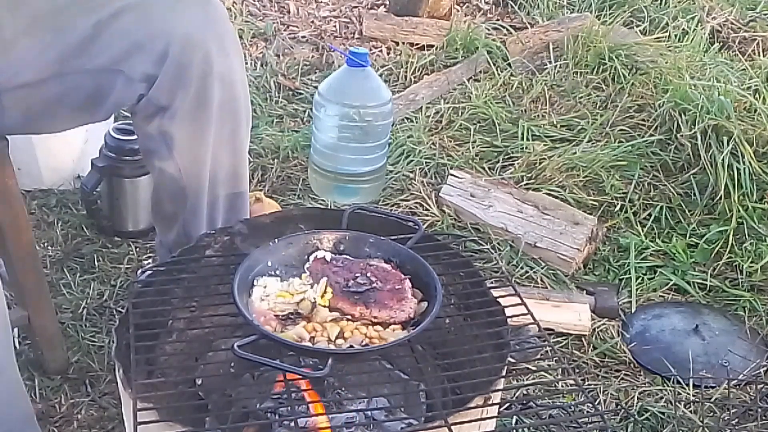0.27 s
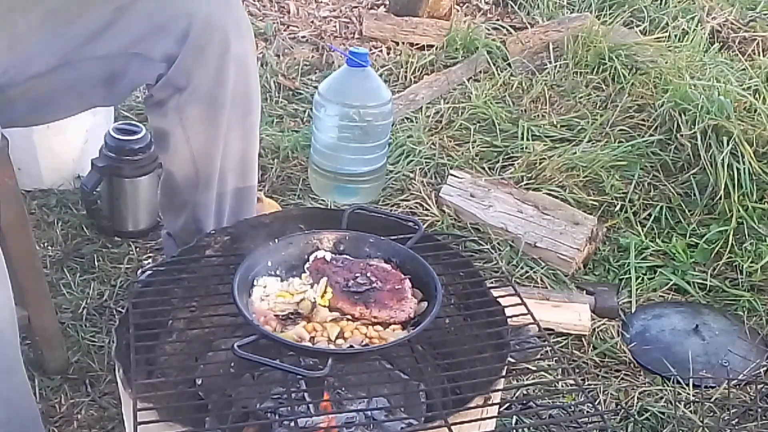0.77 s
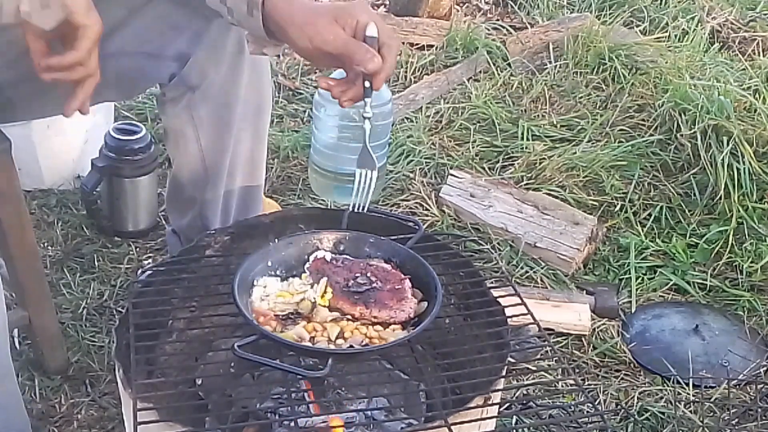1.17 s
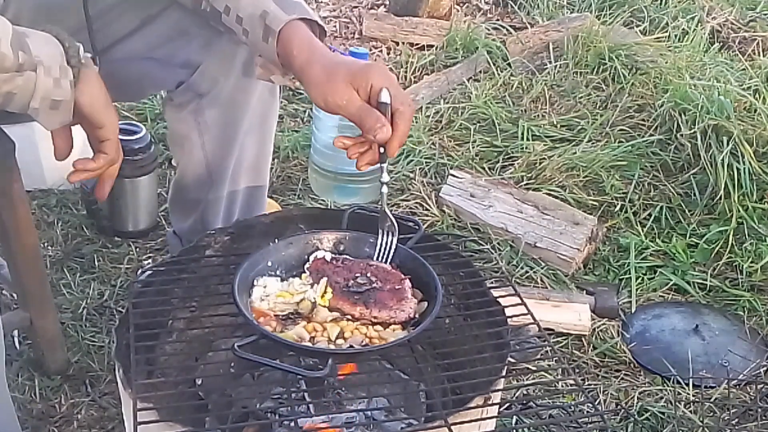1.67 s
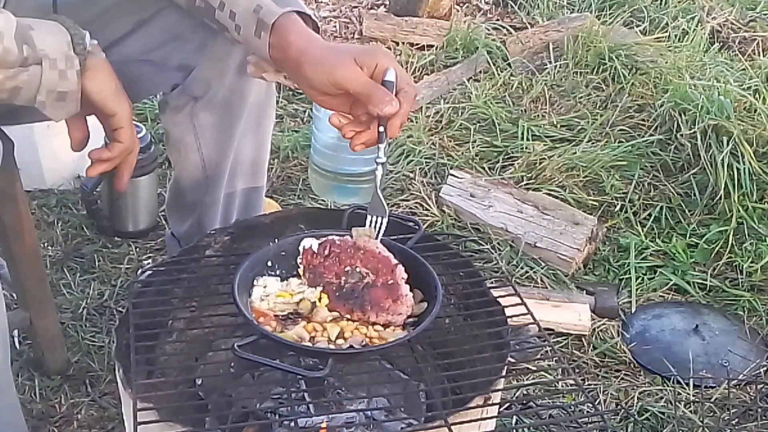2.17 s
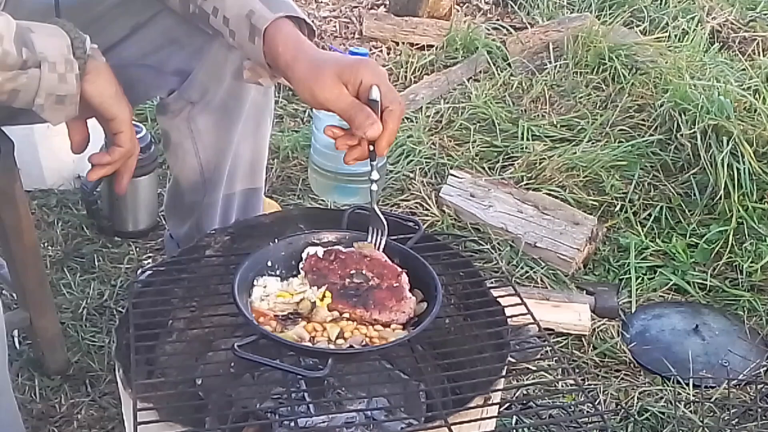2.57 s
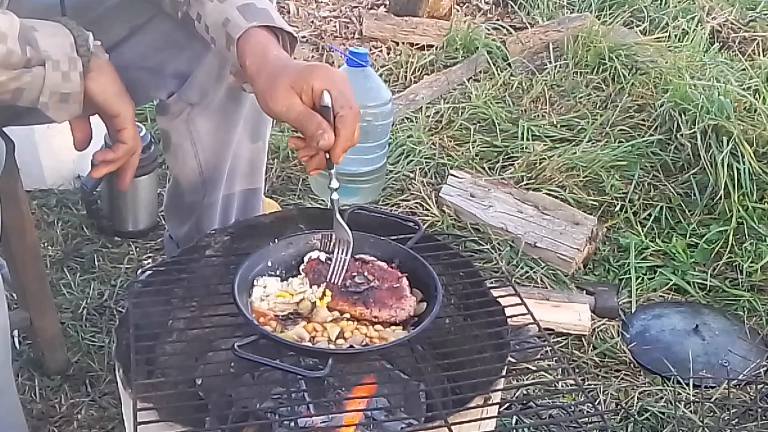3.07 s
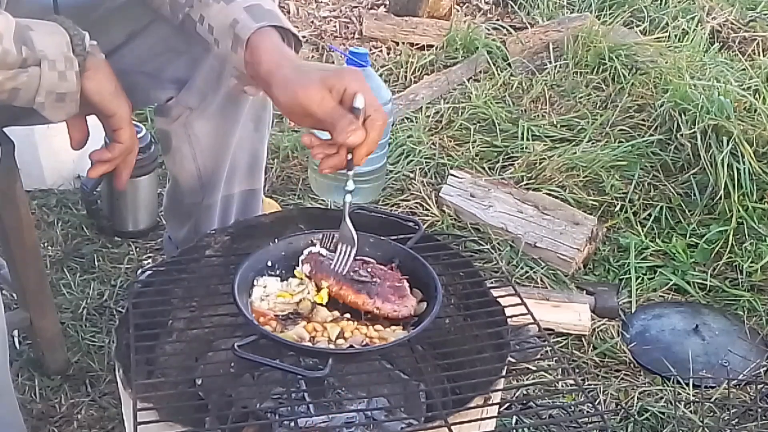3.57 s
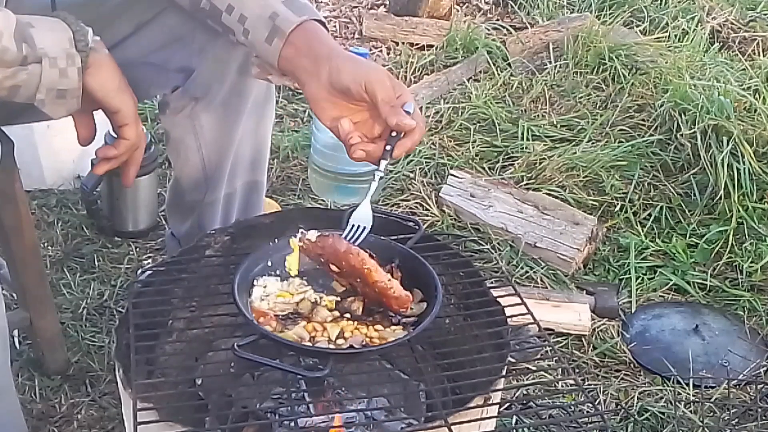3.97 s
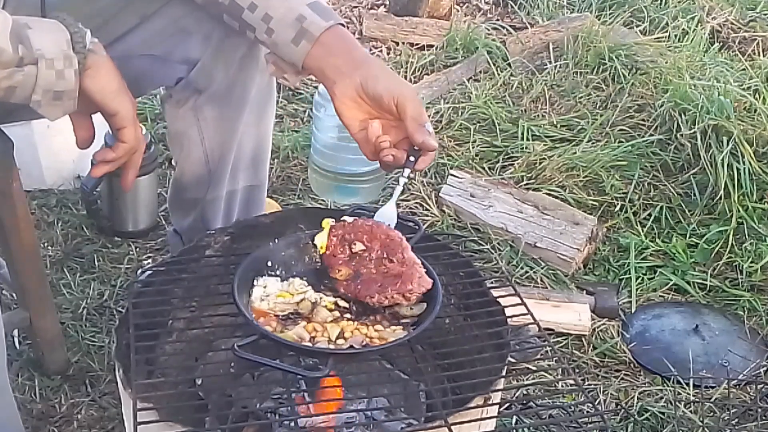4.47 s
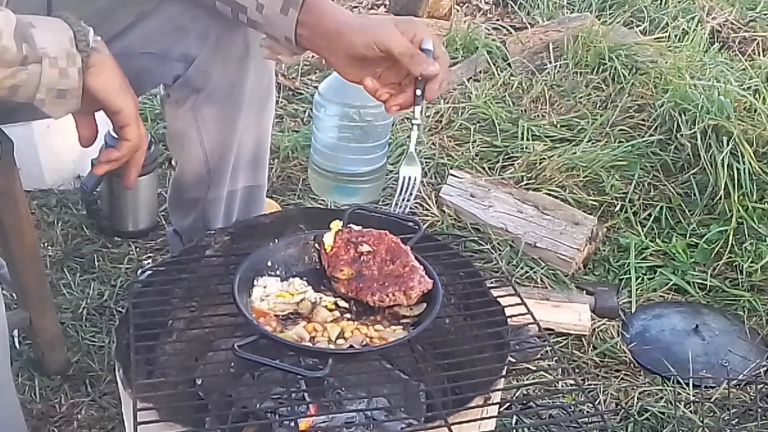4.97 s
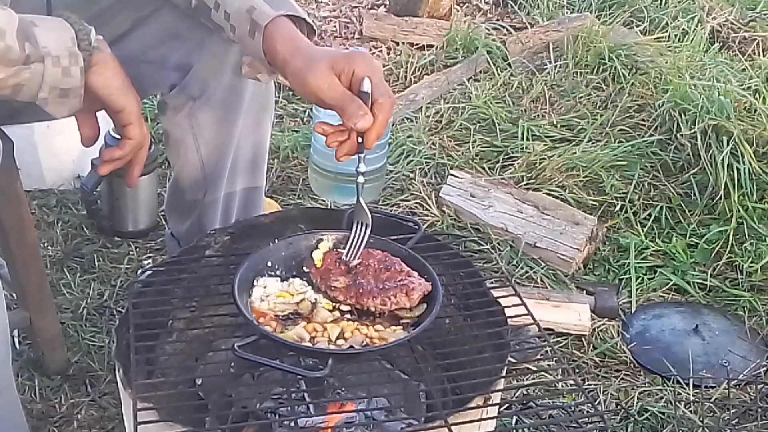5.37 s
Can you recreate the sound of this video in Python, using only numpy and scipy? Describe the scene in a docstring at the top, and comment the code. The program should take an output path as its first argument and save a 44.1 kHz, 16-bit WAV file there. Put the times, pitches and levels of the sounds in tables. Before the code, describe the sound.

Outdoors, close to a pan on a small wood fire, with faint airy noise and soft low draught underneath. For the first second the fat sizzles lightly, with separate bright, dry pops. Pops grow stronger around 1.4 to 1.7 s, and a fork gives a thin, high metallic tick at about 1.6 s. The frying then thins to a quieter, finer hiss until a harder clack of fork on pan at about 2.6 s, short and barely ringing. At once the sizzle surges, crackling thickly, with crowded sharp pops and dry wood snaps from 2.9 to 3.5 s. From about 3.6 s, as the steak is turned, the sound becomes a brighter, finer fizz with fewer pops. The meat lands with a soft low thud near 4.5 s; sizzling pulses on, with crisp pops, snaps near 5.0 to 5.2 s and very faint pressing thumps to the end at roughly 5.6 s.

```python
"""Outdoors, over a small wood fire close by, meat, potatoes and eggs fry in a pan.
Air and draught are filtered noise; burning wood snaps in clicks; steel and pan ring in decaying modes.
The sizzle is three swarms of bubble wavelets, with larger drops popping over it, and surges when
moisture reaches hot metal: a fork lifts the steak and lets it drop, so that juice boils up.
Then the steak is turned over: the sizzle grows finer and brighter, and the meat lands with a soft thud."""
import sys
import numpy as np
from scipy import signal
from scipy.fft import rfft, irfft, next_fast_len
from scipy.io import wavfile
from scipy.ndimage import uniform_filter1d, map_coordinates

SR = 44100
rng = np.random.default_rng(int(sys.argv[2]) if len(sys.argv) > 2 else 0)


def transcribe(signal):
    """Save signal, clipped to [-1, 1], as a 16-bit WAV file at the path in sys.argv[1]."""
    frames = np.atleast_2d(signal).T
    limited = np.clip(frames, -1, 1)
    pcm = np.round(limited * 32767).astype(np.int16)
    wavfile.write(sys.argv[1], SR, pcm)


N = 246947
TOP_HZ = 16000  # band limit of microphone and bubble pitch


def amp(db):
    """Decibels to gain."""
    return np.exp(np.asarray(db) * (np.log(10) / 20))


def unit(x):
    """x at rms 1."""
    return x / np.sqrt(np.mean(x ** 2) + 1e-20)


def wobble(knots_per_s):
    """Smooth random curve through normally distributed knots."""
    knots = rng.standard_normal(int(N * knots_per_s / SR) + 4)
    return map_coordinates(knots, [np.arange(N) * knots_per_s / SR])


def coloured(x, points):
    """x through a causal minimum-phase filter with the gain of the (hz, db) points."""
    size = 2 * next_fast_len(len(x) // 2 + SR // 8)
    hz, db = np.transpose(points)
    grid_hz = np.fft.rfftfreq(size, 1 / SR)
    gain_db = np.interp(np.log(grid_hz + 1), np.log(hz), db)
    cepstrum = irfft(np.log(amp(gain_db)))
    # fold the cepstrum to positive time
    cepstrum[1:size // 2] *= 2
    cepstrum[size // 2 + 1:] = 0
    response = np.exp(rfft(cepstrum))
    return irfft(rfft(x, size) * response, size)[:len(x)]


def bursts(start_s, gain, hz, cycles, size, roundness=1):
    """Wavelets of size samples that swell for some cycles and die away; round ones are narrower in pitch."""
    index = np.ceil(start_s * SR).astype(int)[:, None] + np.arange(size)
    turns = (index / SR - start_s[:, None]) * hz[:, None]
    age = np.abs(turns / cycles[:, None]) / np.sqrt(roundness)
    envelope = (age * np.exp(1 - age)) ** roundness
    phase = rng.uniform(0, 2 * np.pi, (len(start_s), 1))
    waves = gain[:, None] * envelope * np.sin(2 * np.pi * turns + phase)
    return np.bincount(index.ravel(), waves.ravel(), N)[:N]


def scattered(x, wet_db, t60_s):
    """Pan wall, grate and ground add a short diffuse tail, redrawn for each slice of time."""
    t = np.arange(SR // 8) / SR
    edges = np.linspace(0, N, num=110).astype(int)
    wet = np.zeros(N + len(t))
    for a, b in zip(edges, edges[1:]):
        tail = rng.standard_normal(len(t)) * amp(-60 * t / t60_s) * (1 - np.exp(-t / 0.000179))
        wet[a:b + len(t) - 1] += signal.fftconvolve(x[a:b], tail / np.linalg.norm(tail))
    return x + amp(wet_db) * wet[:N]


def swells(rest_db, start_s, rise_s, length_s, top_db, sag_db_per_s, fade_db_per_s):
    """Level in dB of a resting sound plus the power of swells that rise, sag and, after their length, fade."""
    power = np.full(N, amp(rest_db) ** 2)
    for start, rise, length, top in zip(start_s, rise_s, length_s, top_db):
        t = np.maximum(np.arange(N) / SR - start, 0)
        level_db = top - sag_db_per_s * t - fade_db_per_s * np.maximum(t - length, 0)
        power += (np.minimum(t / rise, 1) * amp(level_db)) ** 2
    return 10 * np.log10(power)


def ring(modes, t, attack_s):
    """Decaying modes, each strike scattering their levels by about 1 dB."""
    waves = sum(amp(db + rng.normal(0, 1) - 60 * t / t60_s) * np.sin(2 * np.pi * hz * t)
                for hz, db, t60_s in modes)
    return waves * (1 - np.exp(-t / attack_s))


# open-air noise colour: freq [Hz], relative gain [dB]
AIR_COLOUR = [(60, -14), (110, 0), (180, 1.5), (320, -4.5), (430, -4), (650, -7.5), (1200, -10),
              (3000, -16.5), (7000, -19), (10000, -27), (16000, -20)]
# draught noise colour: freq [Hz], relative gain [dB]
DRAUGHT_COLOUR = [(20, -30), (45, 0.5), (75, 4.5), (120, -0.5), (220, -33), (600, -32.5)]
# draught swells: start_s [s], rise_s [s], length_s [s], level_db [dB]
DRAUGHT_GUSTS = [(0, 0.12, .22, -68.5), (2.9, .05, 0.117, -65), (4.6, 0.064, 0.14, -64),
                 (4.93, 0.12, 0.6, -68)]
DRAUGHT_REST_DB, GUST_FADE_DB_PER_S = -76, 109


def outdoors():
    """Open air and the fire's draught: two coloured noises of uneven level, the draught swelling in gusts."""
    gusts = np.transpose(DRAUGHT_GUSTS)
    draught_db = swells(DRAUGHT_REST_DB, *gusts, sag_db_per_s=0, fade_db_per_s=GUST_FADE_DB_PER_S)
    air = amp(-63 + 0.63 * wobble(20)) * unit(coloured(rng.standard_normal(N), AIR_COLOUR))
    rumble = unit(coloured(rng.standard_normal(N), DRAUGHT_COLOUR))
    return air + amp(draught_db + 1.3 * wobble(11)) * rumble


# dry snaps of burning wood: start_s [s], level_db [dB, before a 1 dB cut]
WOOD_SNAPS = [(.767, -39), (1.0824, -35), (1.6727, -36), (2.8968, -31), (2.931, -36), (3.1048, -33),
              (3.2848, -38), (3.2968, -29.5), (3.3915, -31), (4.5449, -30), (5.0076, -31), (5.0927, -33),
              (5.1923, -26.5)]


def fire():
    """Wood fibres break in clicks too short to have a pitch."""
    start_s, level_db = np.transpose(WOOD_SNAPS)
    count = len(start_s)
    return bursts(start_s, amp(level_db - 1.0), np.full(count, 10500.), np.full(count, .55), size=60)


# meat lands and is pressed down: start_s [s], level_db [dB], pitch_hz [Hz]
MEAT_THUDS = [(4.528, -45, 87.8), (4.532, -45.5, 165), (4.607, -52, 97), (5.112, -55, 100),
              (5.186, -54.5, 85), (5.255, -56, 88), (5.322, -58, 88), (5.41, -54, 112), (5.412, -55, 60)]


def meat():
    """The soft steak gives a low push with no ring."""
    start_s, level_db, pitch_hz = np.transpose(MEAT_THUDS)
    return bursts(start_s, amp(level_db), pitch_hz, np.full(len(start_s), .58), size=4000, roundness=1.9)


# steel meets the pan and chatters: start_s [s], tick_db [dB], tick_hz [Hz],
# tick_swell [cycles, before roundness], ring_db [dB], knock_db [dB]
FORK_CONTACTS = [(1.6263, -20, 7650, 1.8, -25, -71), (1.6268, -24.5, 5140, 0.99, -26, -71),
                 (1.632, -33, 4900, 1.2, -35, -75), (2.4503, -59, 2680, 0.45, -46, -45),
                 (2.5724, -17.5, 3830, 1.3, -24.5, -20.5), (2.5732, -23, 6700, 1.7, -23, -55)]
# ring of fork and rim: freq_hz [Hz], level_db [relative dB], t60_s [s]
STEEL_MODES = [(3200, -17, 0.016), (4850, -17, 0.014), (5400, -21, 0.055), (5720, -7.5, 0.014),
               (6190, -16, 0.023), (6570, -21, 0.03), (6860, -8, 0.02), (7330, -13, 0.012),
               (7600, -18, 0.04), (8120, -13, 0.007), (10450, -14, 0.0077)]
# loaded pan on the grate: freq_hz [Hz], level_db [relative dB], t60_s [s]
PAN_MODES = [(208, -24.5, 0.016), (275, -22, 0.014), (437, -10.5, 0.024), (560, -12, 0.014),
             (680, -9, 0.0081), (780, -15.5, 0.011), (1490, -5, 0.0087), (1859, -7.5, 0.01),
             (2360, -5.5, 0.0063)]
# colour of the steel's crack: freq [Hz], relative gain [dB]
CRACK_COLOUR = [(300, -26), (2000, -9), (4000, 3), (7300, 9), (9000, 2), (12500, -22), (16000, -20)]
# how well the knock carries: freq [Hz], gain [dB]
KNOCK_COLOUR = [(50, -27.5), (130, -11), (210, 0.5), (320, -9), (410, 1.5), (800, 2), (1100, 1), (1450, 0)]


def fork():
    """A light touch ticks and rings the steel; a heavy one also clicks hard and knocks the pan on the grate."""
    out, t = np.zeros(N + SR), np.arange(SR // 5) / SR
    for start_s, *_, ring_db, knock_db in FORK_CONTACTS:
        chatter = unit(coloured(rng.standard_normal(len(t)), CRACK_COLOUR))
        # sharp onset over a longer, weaker tail
        crack = chatter * (amp(-3 - 60 * t / .004) + amp(-21 - 60 * t / .05))
        steel = ring(STEEL_MODES, t, attack_s=0.0003) + crack
        knock = coloured(ring(PAN_MODES, t, attack_s=0.00026), KNOCK_COLOUR)
        out[round(start_s * SR):][:len(t)] += amp(ring_db) * steel + amp(knock_db) * knock
    start_s, tick_db, tick_hz, tick_cycles, _, knock_db = np.transpose(FORK_CONTACTS)
    count = len(start_s)
    tick = bursts(start_s, amp(tick_db), tick_hz, tick_cycles, size=200, roundness=3.8)
    click = bursts(start_s, amp(knock_db - 4.0), np.full(count, 11500.), np.full(count, .6), size=60)
    return out[:N] + tick + click


# larger drops bursting in hot fat: start_s [s], level_db [dB, before colour],
# pitch_hz [Hz], swell [cycles, before roundness]
DROP_POPS = [(0.1215, -24.5, 4020, 0.67), (0.1251, -31, 4430, 0.3), (0.1519, -29.5, 4155, 0.53),
             (0.1756, -30, 4290, 0.59), (0.191, -32.5, 3730, 0.86), (0.2303, -22.5, 3800, 0.9),
             (0.2583, -31.5, 4000, 0.75), (0.3037, -35, 3740, 0.95), (0.3122, -35.5, 3880, 0.94),
             (0.351, -36, 3520, 0.91), (0.378, -35, 4010, 0.97), (0.402, -27, 4730, 0.32),
             (0.409, -28.5, 4400, 0.59), (0.4743, -29, 3540, 0.19), (0.5542, -29, 5950, 0.46),
             (0.5566, -29, 5950, 0.52), (0.5612, -21, 4290, 0.31), (0.582, -26, 4730, 0.52),
             (0.5849, -27, 3880, 0.53), (0.6204, -39, 3520, 1.1), (0.6304, -30.5, 4440, 0.52),
             (0.6514, -35, 4000, 0.74), (0.7647, -28, 3410, 0.39), (0.767, -33, 4580, 0.44),
             (0.8109, -33.0, 3760, 0.76), (0.866, -31, 3640, 0.23), (0.92, -33.5, 4290, 0.48),
             (0.9314, -34.5, 3640, 0.52), (1.0044, -33, 4240, 0.9), (1.0824, -25.5, 4580, 0.52),
             (1.1369, -35, 4150, 0.32), (1.1687, -30, 4570, 0.33), (1.1733, -24, 4010, 0.21),
             (1.1876, -35, 4730, 0.46), (1.2082, -34.5, 6790, 0.87), (1.253, -36.5, 7020, 1.8),
             (1.2808, -33.5, 4150, 0.46), (1.3292, -35, 4010, 0.76), (1.3395, -28.5, 3300, 0.43),
             (1.3488, -38, 3520, 0.5), (1.3813, -25, 2800, 0.55), (1.3815, -20.5, 5290, 0.25),
             (1.4147, -24, 4010, 0.62), (1.4185, -21.5, 3650, 0.42), (1.442, -33, 5600, 0.5),
             (1.476, -34, 4730, 0.52), (1.5124, -19, 3900, 0.44), (1.5338, -16, 4600, 0.39),
             (1.5811, -28, 5390, 0.34), (1.5846, -24, 5030, 0.4), (1.5975, -36, 6570, 1.8),
             (1.6724, -25, 4580, 0.29), (1.6775, -21.5, 3130, 0.45), (1.6847, -37, 4200, 0.8),
             (1.7102, -31.0, 5050, 0.49), (1.7424, -32.5, 3880, 0.49), (1.8161, -32, 4580, 0.56),
             (1.8311, -30, 3880, 0.64), (1.8691, -33.5, 3300, 0.46), (1.9192, -27.0, 4730, 0.51),
             (1.9467, -29, 2460, 0.37), (2.0007, -40, 4140, 1.41), (2.0211, -22, 3410, 0.19),
             (2.186, -36.5, 5640, 1.7), (2.189, -28.5, 7020, 0.42), (2.237, -31.5, 2220, 0.21),
             (2.3655, -35, 4290, 0.16), (2.4454, -28, 7250, 0.26), (2.4516, -21, 2890, 0.16),
             (2.591, -29.5, 2350, 0.74), (2.6818, -24.5, 3520, 0.25), (2.7257, -27.5, 3190, 0.2),
             (2.818, -30, 4110, 0.5), (2.8329, -24.5, 4530, 0.67), (2.879, -26, 5700, 1.44),
             (2.8817, -29, 4060, 1.0), (2.8927, -30, 4540, 0.7), (2.8966, -16.5, 4600, 0.32),
             (2.9342, -25.5, 4590, 0.5), (2.9365, -28, 4820, 0.5), (2.955, -26.0, 4120, 0.76),
             (2.9743, -30, 3900, 0.7), (3.0064, -28.0, 4550, 1.6), (3.019, -24, 4010, 0.29),
             (3.0263, -19.5, 3737, 0.32), (3.0491, -28.5, 4290, 0.73), (3.0748, -28, 3340, 0.3),
             (3.0975, -31, 4200, 0.7), (3.1112, -26, 4140, 0.41), (3.1168, -30, 4910, 0.4),
             (3.129, -31.5, 6870, 1.7), (3.1583, -18, 4700, 0.72), (3.1954, -18.5, 4730, 0.52),
             (3.2, -28, 5070, 0.52), (3.2022, -20, 4010, 0.36), (3.21, -25, 4890, 0.5),
             (3.2115, -26, 4630, 0.55), (3.2232, -20.0, 4430, 0.41), (3.23, -26, 4500, 0.5),
             (3.2357, -28, 5010, 0.4), (3.2493, -24, 2900, 0.26), (3.2561, -24, 4460, 0.2),
             (3.2703, -27, 4290, 0.46), (3.2737, -26.5, 3763, 0.61), (3.3316, -30, 4280, 0.6),
             (3.349, -29, 4070, 0.5), (3.3747, -30, 4560, 0.4), (3.383, -26, 4760, 0.3),
             (3.3847, -21.5, 4700, 0.5), (3.3914, -25, 6100, 0.32), (3.4015, -29.5, 4730, 1.1),
             (3.4293, -28, 3190, 0.52), (3.4361, -20, 4290, 0.2), (3.4403, -23.5, 4150, 0.32),
             (3.4826, -34, 4250, 0.7), (3.491, -29, 3100, 0.22), (3.5074, -30, 5390, 1.1),
             (3.5327, -25, 4010, 0.6), (3.5418, -28, 2990, 0.62), (3.5763, -29, 3770, 0.4),
             (3.6124, -34, 4970, 0.4), (3.6347, -26.5, 2300, 0.32), (3.6464, -22.0, 4310, 0.52),
             (3.661, -24, 4580, 0.32), (3.665, -31, 4730, 1.1), (3.839, -27, 5020, 0.46),
             (3.8918, -28, 5660, 0.26), (3.944, -29, 5580, 0.32), (3.9833, -33.5, 8150, 1.6),
             (3.9955, -25.5, 5570, 0.29), (4.0181, -26.5, 5660, 0.3), (4.0652, -30, 5680, 0.6),
             (4.1705, -28, 5580, 0.59), (4.1835, -31, 5760, 1.1), (4.3399, -27, 6860, 0.7),
             (4.359, -24, 5160, 0.33), (4.3617, -27, 6130, 0.59), (4.3918, -31, 5480, 0.8),
             (4.4604, -24.5, 6590, 0.34), (4.4668, -27.5, 6790, 0.52), (4.504, -26, 5390, 0.25),
             (4.518, -33, 3760, 1), (4.5413, -26.0, 5760, 0.28), (4.5451, -19, 6240, 0.31),
             (4.56, -31, 5760, 0.5), (4.5728, -26, 7020, 0.55), (4.6402, -32, 6150, 0.9),
             (4.6723, -23, 6000, 0.77), (4.7681, -31.5, 4430, 0.92), (4.8447, -27.5, 5210, 0.6),
             (4.8685, -26, 9960, 0.45), (4.888, -31.5, 3600, 1.1), (4.888, -32, 5500, 1.6),
             (4.912, -30, 6150, 1.5), (4.9243, -28.5, 2730, 0.74), (4.9246, -33.5, 1660, 0.9),
             (4.9683, -28, 6860, 0.4), (4.9798, -23, 4860, 0.39), (4.984, -17, 5570, 0.25),
             (5.0474, -33.5, 5510, 1.4), (5.0548, -30, 4600, 0.68), (5.0669, -29.5, 4220, 0.5),
             (5.0793, -28, 6290, 0.4), (5.0927, -23, 6360, 0.49), (5.0973, -25.5, 5760, 0.67),
             (5.136, -28, 7250, 0.46), (5.1402, -26, 7250, 0.37), (5.1548, -23.0, 5500, 0.4),
             (5.1718, -26, 5570, 0.34), (5.193, -22.5, 5700, 0.43), (5.1969, -25, 6150, 0.34),
             (5.2456, -26.5, 3880, 0.22), (5.286, -31, 4730, 0.92), (5.3604, -28, 6630, 0.3),
             (5.3727, -28, 6150, 0.76), (5.3917, -29, 6360, 0.52), (5.4251, -25.5, 7740, 0.41),
             (5.4276, -29, 5600, 2.2), (5.472, -23, 6150, 0.27), (5.528, -26, 5990, 0.4),
             (5.534, -28.5, 5570, 0.99), (5.5825, -27.5, 5900, 1.3), (5.5854, -26, 6130, 0.2)]
# how drops carry out of the pan: freq [Hz], gain [dB]
DROP_COLOUR = [(200, -17), (800, -16.5), (1400, -4), (2200, -1.5), (3500, 0), (8000, 1.5), (10000, -3.5),
               (16000, -8)]
SNAP_DB, SNAP_PITCH, SNAP_LENGTH = -23, 2, 0.61  # level, pitch and cycles relative to the pop
SPIT_COUNT, SPIT_DB, SPIT_RANGE_DB = 300, -44.5, 10  # weakest level, span up to the rare strong ones
SPIT_FOLLOWS_DB_PER_DB = 0.98  # of fat level
SPIT_HZ, SPIT_OCTAVES, SPIT_HZ_PER_DB = 4730, 0.32, 73  # pitch, scatter, rise with fizz level


def spits(fat_db, fizz_db):
    """Water drops flash to steam, each with a tiny snap and a short pop; lesser drops burst at random."""
    start_s, level_db, pitch_hz, cycles = np.transpose(DROP_POPS)
    pop = bursts(start_s, amp(level_db), pitch_hz, cycles, size=200, roundness=1.5)
    snap = bursts(start_s, amp(level_db + SNAP_DB), SNAP_PITCH * pitch_hz, SNAP_LENGTH * cycles, size=80)
    when, strength, pitch, life = rng.random((SPIT_COUNT, 4)).T
    at = (when * N).astype(int)
    lively_db = (fat_db - fat_db.mean())[at]
    fizzing_db = (fizz_db - fizz_db.mean())[at]
    small_db = SPIT_DB + SPIT_RANGE_DB * strength ** 2.3 + SPIT_FOLLOWS_DB_PER_DB * lively_db
    small_hz = (SPIT_HZ + SPIT_HZ_PER_DB * fizzing_db) * 2 ** (SPIT_OCTAVES * (2 * pitch - 1))
    small = bursts(at / SR, amp(small_db), small_hz, 0.17 + 0.5 * life, size=160, roundness=1.42)
    return coloured(pop + snap + small, DROP_COLOUR)


# moisture reaches hot metal as the fork digs, lifts, drops, presses and turns the steak:
# start_s [s], rise_s [s], length_s [s], fat_db [dB], juice_db [dB], fizz_db [dB]
PAN_WETTINGS = [(0, .08, .5, -61.5, -73, -70), (1.02, .08, .19, -57.5, -66, -65),
                (1.39, .1, .59, -59.5, -80, -63.5), (1.87, .05, .22, -70, -63.5, -75),
                (2.097, 0.278, .45, -74, -65.5, -57.5), (2.55, .07, 1.12, -52, -59, -58),
                (2.75, .08, .16, -47.5, -65, -60), (2.96, 0.042, .1, -54.5, -55, -70),
                (3.11, .07, .17, -53.5, -61, -74), (3.42, .08, .23, -57, -56, -70),
                (3.6, .26, 2.0, -56.5, -64.5, -51.5), (3.71, .13, .32, -59, -73, -52),
                (4.08, .07, .27, -54.5, -64, -51), (4.47, .06, .25, -61, -65.5, -55.5),
                (4.82, 0.0602, .2, -57, -62, -52), (5.12, .04, .22, -63, -67, -59.5),
                (5.33, .07, .26, -56, -58, -52.5)]
FAT_REST_DB, JUICE_REST_DB, FIZZ_REST_DB = -60, -68, -68.5  # the pan left alone
WET_SAG_DB_PER_S, WET_FADE_DB_PER_S = 2.5, 70  # water boils down, then dries off


def boiling():
    """Levels in dB: each wetting adds its own share of fat, juice and fizz, some hardly at all, then fades."""
    start_s, rise_s, length_s, *tops_db = np.transpose(PAN_WETTINGS)
    rests_db = (FAT_REST_DB, JUICE_REST_DB, FIZZ_REST_DB)
    return [swells(rest_db, start_s, rise_s, length_s, top_db, WET_SAG_DB_PER_S, WET_FADE_DB_PER_S)
            for rest_db, top_db in zip(rests_db, tops_db)]


def bubbles(busy, rate_per_s, hz, spread, cycles, spike_db, clump_db, size):
    """Bursting bubbles, many faint and few loud, in brief clumps; busy is the share that forms."""
    count = int(rate_per_s * N / SR)
    start_s = rng.uniform(0, (N - 1) / SR, count)
    forms = rng.random(count) < busy[(start_s * SR).astype(int)]
    pitch_hz = np.minimum(hz * np.exp(spread * rng.standard_normal(count)), TOP_HZ)
    # cap the random strengths so that no single bubble stands out too far
    strength = np.minimum(rng.exponential(size=count), 5)
    life = cycles * np.exp(0.36 * rng.standard_normal(count))
    swarm = bursts(start_s[forms], amp(spike_db * strength[forms]), pitch_hz[forms], life[forms], size)
    swarm = swarm * amp(clump_db * wobble(70))
    # level the power over about a tenth of a second, so the given level curves set the loudness
    power = uniform_filter1d(uniform_filter1d(swarm ** 2, size=SR // 10), size=SR // 30)
    return swarm / np.sqrt(np.abs(power) + 1e-12)


# boiling-juice colour: freq [Hz], relative gain [dB]
JUICE_COLOUR = [(300, -23), (700, -7.5), (1100, -8), (1330, -8.5), (1530, -1), (2050, -5.5), (2470, 1),
                (3050, -1), (4000, -7.5), (7000, -14), (16000, -32.5)]
# crackling-fat colour: freq [Hz], relative gain [dB]
FAT_COLOUR = [(300, -20), (1000, -6), (2200, -5), (3100, -3.5), (3500, 1), (4500, -1.5), (5500, -1),
              (7500, 0.5), (9500, -11.5), (16000, -8.5)]
# fine-fizz colour: freq [Hz], relative gain [dB]
FIZZ_COLOUR = [(500, -2.5), (2450, -1.5), (3100, -13), (3600, -3), (5400, 7.5), (6600, 2.5), (8100, 5.5),
               (10000, 0.5), (12500, 0), (16000, -1)]


def sizzle(fat_db, juice_db, fizz_db):
    """Fat crackles and stirs the juice, which boils in coarser bubbles; freshly wetted metal fizzes."""
    busy = amp(.9 * (fat_db + 49.5))  # a quiet pan has fewer bubbles, heard one by one
    fat = bubbles(busy, rate_per_s=4200, hz=4410, spread=0.22, cycles=0.44,
                  spike_db=4.5, clump_db=1.54, size=80)
    boil = bubbles(busy, rate_per_s=2800, hz=2080, spread=0.31, cycles=0.22,
                   spike_db=4.5, clump_db=3.0, size=100)
    fizz = bubbles(busy, rate_per_s=8000, hz=7560, spread=0.37, cycles=0.3,
                   spike_db=5.0, clump_db=0.5, size=52)
    unrest_db = 0.67 * wobble(14)
    juice_part = amp(juice_db) * unit(coloured(boil + 0.9 * fat, JUICE_COLOUR))
    fat_part = amp(fat_db) * unit(coloured(fat, FAT_COLOUR))
    fizz_part = amp(fizz_db + 0.38 * wobble(18)) * unit(coloured(fizz, FIZZ_COLOUR))
    return amp(unrest_db) * (juice_part + fat_part + fizz_part)


def scene():
    """The pan close by, in the open."""
    fat_db, juice_db, fizz_db = boiling()
    background = outdoors() + meat()
    cutlery = scattered(fork(), wet_db=-15.5, t60_s=0.026)
    popping = scattered(spits(fat_db, fizz_db) + fire(), wet_db=-9.5, t60_s=0.014)
    frying = scattered(sizzle(fat_db, juice_db, fizz_db), wet_db=-10.5, t60_s=0.035)
    return (background + cutlery + popping + frying)[None]


def record(dry):
    """The microphone keeps nothing above its band limit."""
    size = next_fast_len(N + SR // 2)
    passband = np.fft.rfftfreq(size, 1 / SR) < TOP_HZ
    return irfft(rfft(dry, size) * passband, size)[:, :N]


dry = scene()
out = record(dry)
transcribe(out)
```